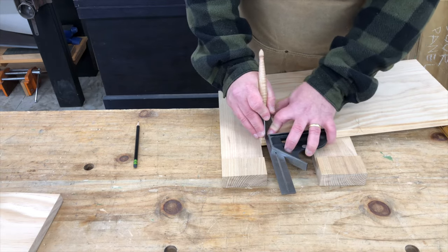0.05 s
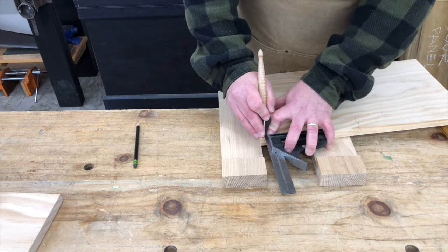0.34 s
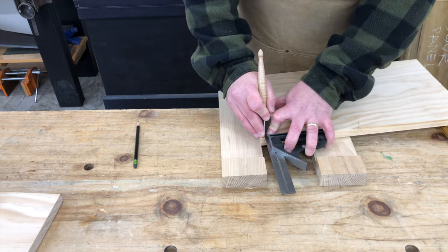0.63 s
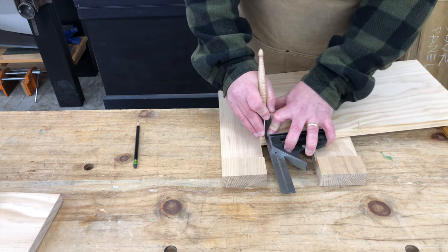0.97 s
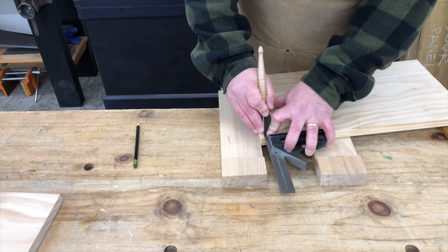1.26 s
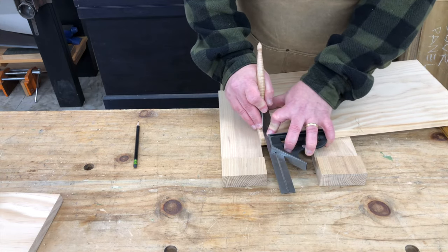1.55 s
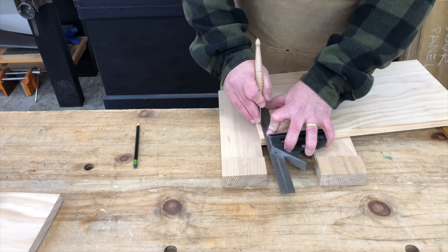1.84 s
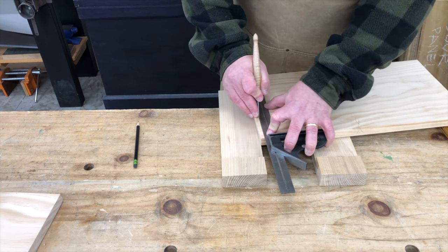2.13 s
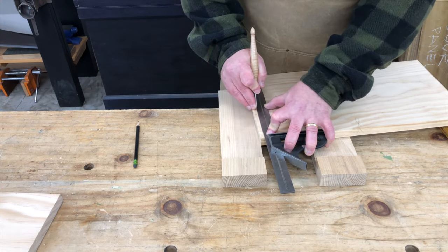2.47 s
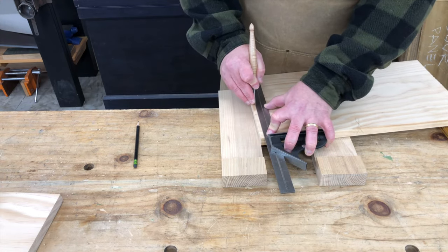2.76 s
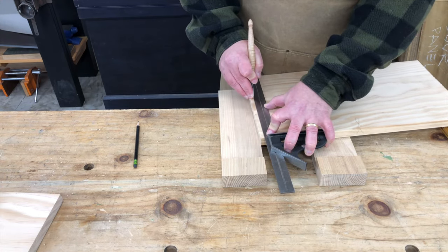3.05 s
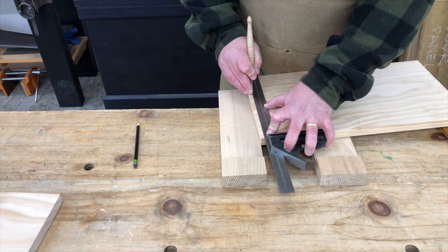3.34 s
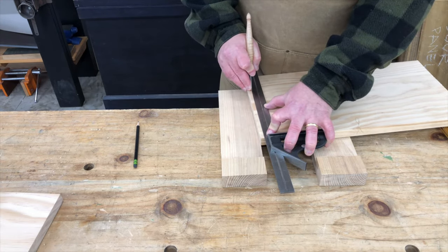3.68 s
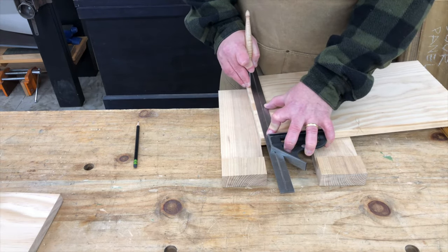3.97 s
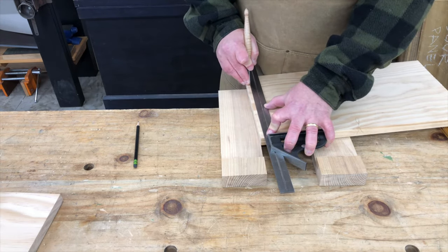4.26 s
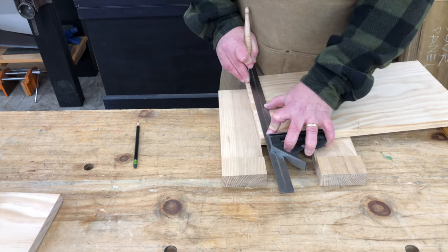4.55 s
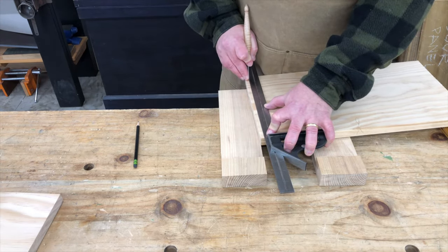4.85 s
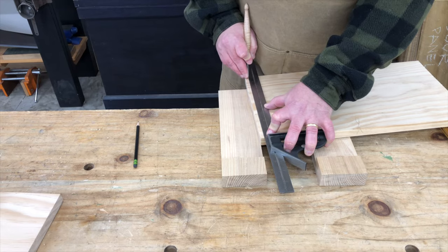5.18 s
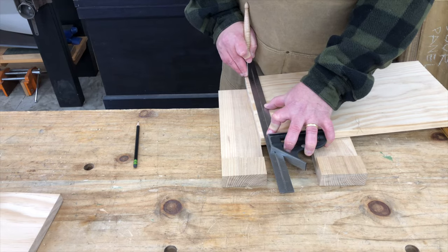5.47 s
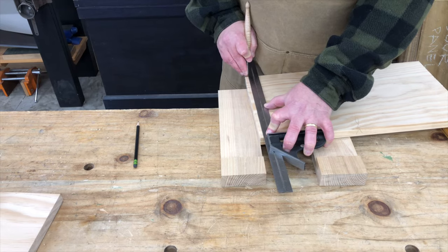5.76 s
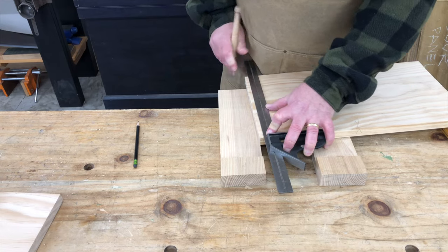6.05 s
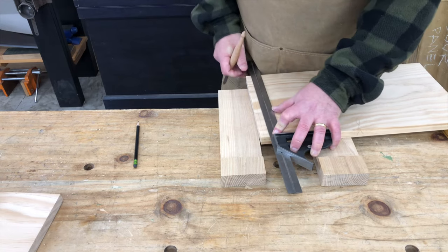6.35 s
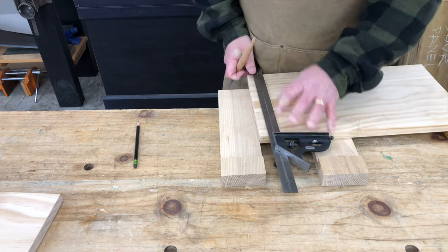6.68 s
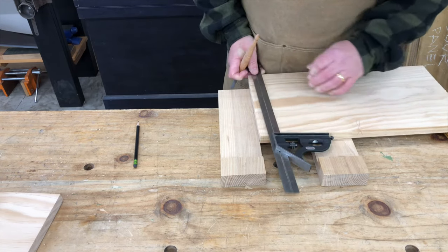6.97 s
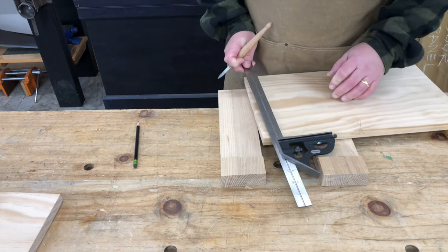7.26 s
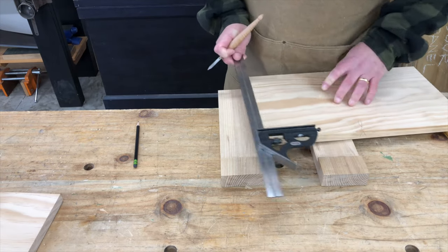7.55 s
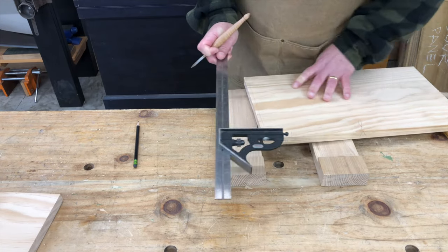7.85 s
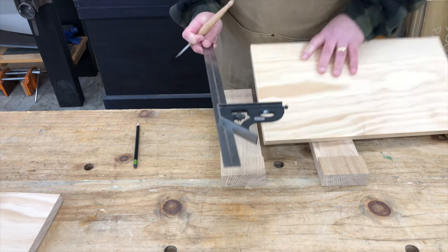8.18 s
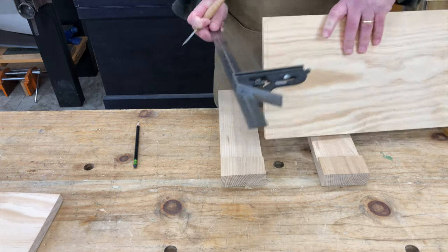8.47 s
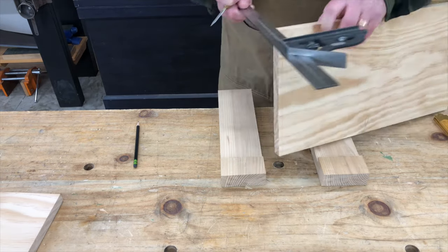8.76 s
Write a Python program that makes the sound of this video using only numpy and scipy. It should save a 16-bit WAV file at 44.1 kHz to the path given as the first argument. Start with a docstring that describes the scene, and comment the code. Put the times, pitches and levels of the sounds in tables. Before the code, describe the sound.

A knife scrapes across a wooden board in dry, crackling strokes, then the board knocks and a steel square rattles.

```python
"""Marking a pine board with a knife

A knife is drawn along a steel square: one long dry stroke, then short ones that snap through the grain.
Stick-slip friction makes the wood rasp and the blade hiss. The board rocks on its blocks and knocks in
its damped modes, hands rub over it, and the square rattles as both are lifted off the bench.
The bench rumbles under the work, and a quiet workshop reverberates around it."""
import sys
import numpy as np
from scipy import signal
from scipy.fft import rfft, irfft
from scipy.io import wavfile

SR = 44100
rng = np.random.default_rng(int(sys.argv[2]) if len(sys.argv) > 2 else 0)


def waveform_to_disk(signal):
    """Save audio, clipped to [-1, 1], as 16-bit WAV at the path in sys.argv[1]."""
    frames = np.transpose(np.atleast_2d(signal))
    scaled = np.clip(frames, -1, 1) * 32767
    samples = np.round(scaled).astype(np.int16)
    wavfile.write(sys.argv[1], SR, samples)


N = 397765
TIME = np.arange(N) / SR

# The long cut, as the hand bears down and eases. Each row: time in seconds, rasp level in dB.
LONG_CUT = [(1.27, -64.5), (1.43, -57), (1.54, -45), (1.78, -50), (2.3, -46.5), (2.44, -53), (2.78, -49.5),
            (2.86, -44.5), (2.98, -49.5), (3.4, -46.5), (3.55, -58.5)]
# Short strokes before and after it. Each row: start in seconds, length in seconds, rasp level in dB,
# hiss level in dB, swell from start to end in dB, bench rumble in dB.
SHORT_STROKES = [(1.044, 0.14, -46.5, -52.5, -1, -55), (3.542, 0.14, -42, -57, 18, -66),
                 (3.707, 0.23, -47.5, -64.5, 4, -70), (4.122, 0.37, -47, -62, -9, -69),
                 (4.519, 0.17, -46.5, -55.5, 5.5, -62), (4.839, 0.076, -43, -51, 8, -58),
                 (5.092, 0.17, -53, -60.5, 19.5, -78), (5.683, 0.043, -40.5, -48.5, 6.5, -51)]
# The blade's place on the board. Each row: time in seconds, rasp resonance in Hz, its relative level
# in dB, echo delay along the rule in seconds.
BLADE_PLACE = [(1.05, 2060, -4, 0.00085), (1.35, 1900, -0.5, 0.00088), (1.6, 1810, 5.5, 0.00088),
               (1.95, 1660, 3, 0.00091), (2.3, 1150, -2.5, 0.0009), (2.9, 1050, -1.5, 0.00081),
               (3.5, 1010, 0, .0008), (4.6, 1450, 1, 0.00087), (5.3, 1630, -1, 0.00086),
               (5.9, 1110, -20, 0.0008)]
# Spectra of the wood's rasp and the edge's hiss. Each row: frequency in Hz, relative density in dB.
RASP_SPECTRUM = [(40, -15), (80, -5), (130, 10), (230, -13), (400, 3), (560, -6.5), (800, 1.5), (1100, -6),
                 (1600, -2), (2100, -6.5), (2800, -5.5), (3150, -13), (5000, -37.5)]
HISS_SPECTRUM = [(1800, -22), (2700, 2), (3150, -1), (3700, 2), (4600, -5.5), (5200, -9.5), (5700, -2.5),
                 (6200, -21), (6700, -6), (8400, -14.5), (9500, -21.5), (12400, -19), (13500, -24),
                 (15500, -34)]
# Modes of the thin blade, the board on the bench and the hand-damped steel square.
# Each row: frequency in Hz, relative level in dB, T60 (time to decay by 60 dB) in seconds.
BLADE_MODES = [(2380, -5.5, 0.2), (2970, -37, 0.031), (3700, -7, 0.046), (3910, 8.5, 0.032),
               (4570, 6.5, 0.024), (5190, 8, 0.032), (6200, 7, 0.021), (6450, 5, 0.014), (7140, 1, 0.021),
               (7320, -23, 0.0067), (8100, 3, 0.022), (11500, -25, 0.0027), (12500, 0, .004)]
BOARD_MODES = [(130.9, -5, 0.19), (148.6, -12.5, 0.39), (199.3, -21, 0.45), (244, -12, 0.1),
               (313.7, -11, 0.19), (390.2, -3.5, 0.068), (432, -10.5, 0.21), (468, -8.5, 0.33),
               (494.7, 2.5, 0.096), (590.5, -15, 0.14), (631.7, -15.5, 0.18), (732, -10.5, 0.04),
               (735, -13, 0.037), (794.5, -14, 0.13), (903, -13, 0.091), (1008, -13.5, 0.035),
               (1043, -7.5, 0.097), (1075, -1.5, 0.019), (1210, -13, 0.21), (1338, -4, 0.019),
               (1380, -26, 0.24), (1442, -5.5, 0.051), (1760, -8, 0.059), (1850, -9, 0.067),
               (2146, -13, 0.063), (2294, -11.5, 0.064), (2480, -18, 0.1)]
SQUARE_MODES = [(1835, 1, 0.024), (2110, -1, 0.062), (2160, 1, 0.015), (2440, -2.5, 0.035),
                (2920, -5, 0.018), (3202, -2, 0.046), (3880, -20, 0.021), (4070, -6, 0.051),
                (4900, -3, 0.019), (6000, -13, .04), (6600, -11, 0.025), (7740, -12.5, 0.023),
                (9000, -25, .025)]
# The blade breaks hard grain lines. Each row: start in seconds, wood level in dB, treble level in dB,
# nominal length in seconds.
SNAPS = [(2.844, -44, -49, 0.0084), (3.326, -38, -57, 0.0042), (3.347, -40, -50, .003),
         (3.397, -39.5, -46.5, 0.0067), (3.571, -42.5, -47, 0.0054), (3.63, -33, -30, 0.0089),
         (3.6476, -27, -32, .0028), (3.658, -25.5, -37, 0.0062), (3.664, -31, -32.5, .005),
         (3.685, -42, -36, 0.0044), (3.713, -32, -38, 0.004), (3.7232, -30, -34.5, 0.0039),
         (3.7498, -34, -31.5, 0.0036), (3.7707, -34, -38, .0025), (3.8138, -33, -36.5, 0.0031),
         (3.833, -41, -39, 0.0031), (3.838, -31, -37, 0.0023), (3.8745, -25, -41, 0.0017),
         (4.1206, -26, -26, 0.0045), (4.149, -39, -43, 0.0064), (4.176, -50, -40.5, 0.0047),
         (4.203, -33.5, -42, 0.0057), (4.2213, -27.5, -39, 0.0036), (4.302, -50, -41, 0.0082),
         (4.344, -45, -43, 0.0057), (4.382, -37, -43, 0.0061), (4.425, -35, -41, 0.0048),
         (4.597, -43, -42, 0.0021), (4.6355, -36, -33, 0.0072), (4.6642, -25, -28, 0.0035),
         (4.851, -35, -34.5, 0.0042), (4.895, -37, -49, 0.0033), (5.2645, -32, -40.5, 0.0031),
         (5.643, -44.5, -60, 0.0069), (5.658, -39, -53, 0.0047), (5.6919, -21, -34, 0.0037)]
# The spectrum of a snap. Each row: frequency in Hz, relative density in dB.
SNAP_SPECTRUM = [(100, -27), (400, 4.5), (560, -8), (800, 0), (1300, 3.5), (1650, 2), (1950, -6.5),
                 (2400, -2.5), (3050, -18.5), (4600, -10.5), (6500, -19), (8400, -27.5), (9800, -31),
                 (15000, -34.5)]
# The board strikes its blocks. Each row: start in seconds, blow level in dB, contact hardness as a
# cutoff in Hz, tick level in dB.
KNOCKS = [(4.125, -24, 870, -39), (4.307, -29.5, 580, -70), (4.641, -28, 665, -72), (4.664, -28, 643, -61),
          (5.694, -21, 1130, -43), (5.701, -19.5, 203, -74), (6.412, -52, 706, -76),
          (6.5592, -8, 1306, -40.5), (6.5673, -32, 650, -65), (6.77, -36.5, 1100, -59),
          (6.853, -41.5, 900, -75), (7.058, -30, 148, -76), (7.11, -44, 800, -75),
          (7.2386, -28.5, 4500, -34.5), (7.247, -22, 1210, -54), (7.258, -17, 780, -41.5),
          (7.265, -14, 228, -67), (7.2775, -24, 760, -46.5), (7.294, -26, 180, -78),
          (7.503, -22.5, 100, -65), (7.588, -42.5, 590, -76), (7.748, -42.5, 404, -76),
          (7.867, -31.5, 1380, -59), (7.883, -27.5, 298, -52.5), (7.913, -25.5, 130, -56),
          (8.023, -40, 1030, -75), (8.097, -47, 2230, -74), (8.283, -31, 354, -72), (8.304, -25, 200, -72),
          (8.627, -30.5, 1030, -51), (8.646, -22, 870, -43), (8.659, -31.5, 804, -56),
          (8.683, -19.5, 660, -43), (8.71, -32, 440, -54), (8.873, -29, 670, -39), (8.926, -25, 330, -48),
          (8.975, -39, 500, -49), (9.004, -11.5, 860, -30.5)]
# The board's modes shift as it is pressed, left free and lifted. Each row: time in seconds, pitch ratio.
SUPPORT_PITCH = [(4.7, .87), (5.7, .92), (6.0, 1), (8.4, 1), (8.6, .915)]
# Spectra of a blow's tick and of the bench top's many close, damped modes.
# Each row: frequency in Hz, relative density in dB.
TICK_SPECTRUM = [(400, -32), (1500, 2), (2600, -2), (3100, -4), (4200, -4.5), (6000, -8.5), (9000, -18),
                 (15000, -29)]
BENCH_SPECTRUM = [(60, -11.5), (150, -1.5), (300, 0), (520, -1), (800, -2.5), (1300, -5), (1900, -16.5),
                  (3000, -44), (6000, -62)]
# The square hits the board. Each row: start in seconds, level in dB, frequency in Hz favoured by the
# place of contact.
RATTLES = [(8.517, -51, 4020), (8.625, -36, 3060), (8.643, -37, 3100), (8.66, -32, 2130),
           (8.684, -35.5, 4000), (8.721, -36.5, 5000), (8.751, -42.5, 4000), (8.828, -47, 4000),
           (8.871, -43, 3000), (8.927, -52, 4000), (8.97, -44.5, 3080), (8.979, -46.5, 3080),
           (9.005, -24, 1830)]
# Steel touches the wood lightly. Each row: start in seconds, level in dB.
TAPS = [(5.9995, -30), (6.015, -47), (7.559, -40)]
# Hands, sleeves and board slide. Each row: start in seconds, length in seconds, scuff level in dB,
# swish level in dB, swell from start to end in dB, scrape pitch in Hz.
SLIDES = [(5.87, 0.15, -57, -71, 9, 3020), (6.0, 0.098, -53.5, -63.5, -2, 2300),
          (6.12, 0.37, -66, -74.5, -11.5, 2000), (6.464, 0.13, -58, -64, 18, 5600),
          (6.607, 0.33, -54, -68, -4, 5600), (6.896, 0.074, -58.5, -62.5, 10, 4170),
          (7.02, 0.3, -64, -74, -16, 2000), (7.462, 0.29, -56.5, -58.5, 1, 5200),
          (7.924, 0.22, -62.5, -56.5, 7, 5800), (8.196, 0.082, -52.5, -48, 1, 4400),
          (8.27, 0.047, -43, -46, -4.5, 2970), (8.36, 0.05, -54.5, -78, -4, 3000),
          (8.475, 0.16, -67, -56, -6, 3800), (8.614, 0.058, -44.5, -49, 1.5, 7000),
          (8.798, 0.22, -56, -76, -4, 4000)]
# Spectra of the low scuff, the high swish and the room's air.
# Each row: frequency in Hz, relative density in dB.
SCUFF_SPECTRUM = [(40, -12), (130, 8.5), (220, 0), (470, 0), (700, -3), (1300, -5.5), (2100, -12),
                  (3000, -24), (5000, -36)]
SWISH_SPECTRUM = [(1200, -5.5), (2300, -1.5), (3000, -7), (4000, -5), (5500, -11.5), (7000, -15.5),
                  (9000, -22.5), (12000, -27.5), (15500, -37.5)]
AIR_SPECTRUM = [(25, -13.5), (60, 0.5), (130, -9), (250, -8), (480, -3.5), (800, -11), (1250, -10.5),
                (2000, -17.5), (3000, -24.5), (5000, -29), (9000, -32.5), (15000, -33)]
# The workshop's echo. Each row: frequency in Hz, level against the direct sound in dB, T60 in seconds.
REVERB_BANDS = [(99, -15.5, 0.47), (397, -8, 0.47), (910, -5.5, 0.54), (1830, -11.5, 0.53),
                (4700, -15.5, 0.98), (13200, -11.5, 0.33)]


def scoring(rasp_gain, hiss_gain, grain_hz=70, max_catch_db=1.5):
    """Stick-slip excitation: as fibres part, the wood rasps and hums and the edge hisses and sings."""
    times, *columns = np.transpose(BLADE_PLACE)
    place_hz, place_db, echo_s = (np.interp(TIME, times, c) for c in columns)
    fibres = friction(per_s=8200, uneven_db=2.0, catch_hz=129)
    tip = friction(per_s=6000, uneven_db=1.5, catch_hz=120)
    near_blade = cut(moving_resonance(tip, place_hz, width_hz=360), 2320, order=4)
    share = from_db(place_db)
    hum = from_db(-6) * rms_one(ring(cut(fibres, 205), BOARD_MODES))
    rasp = (colour(fibres, RASP_SPECTRUM) + share * near_blade) / np.sqrt(1 + share ** 2) + hum
    against_rule = friction(per_s=8000, uneven_db=2.5, catch_hz=100)
    singing = rms_one(cut(ring(against_rule, BLADE_MODES), 1900, "high"))
    hiss = from_db(-2.5) * colour(fibres, HISS_SPECTRUM) + from_db(-6) * singing
    # A short echo along the rule forms a comb filter that slides with the blade.
    hiss = hiss + .35 * np.interp(TIME - echo_s, TIME, hiss)
    # The deeper the score, the more the blade catches and runs on hard and soft grain.
    catch_db = np.clip(1 + 0.5 * (TIME - times[0]), 0, max_catch_db)
    catching = flutter(catch_db, grain_hz) + fibre_breaks() * catch_db / max_catch_db
    return catching * (from_db(-1.55) * rasp_gain * rasp + from_db(-0.73) * hiss_gain * hiss)


def knife_effort(hiss_offset_db=-8.5, dulling_db_per_s=1):
    """Amplitude follows force: the hand's push sets the gains of rasp, hiss and bench rumble."""
    times, cut_db = np.transpose(LONG_CUT)
    rasp = from_db(np.interp(TIME, times, cut_db)) * (TIME >= times[0]) * (TIME < times[-1])
    hiss = rasp * from_db(hiss_offset_db - dulling_db_per_s * (TIME - times[0]))   # the blade sinks in
    rumble = np.zeros(N)
    for start, length, rasp_db, hiss_db, swell_db, rumble_db in SHORT_STROKES:
        push = gesture(start, length, swell_db, attack_s=0.025, release_db_per_s=243)
        rasp += from_db(rasp_db) * push
        hiss += from_db(hiss_db) * push
        rumble += from_db(rumble_db) * push
    return rasp, hiss, rumble


def fibre_breaks(per_s=24, decay_s=0.0031):
    """A Poisson process: small fibres give way at random, each briefly raising the gain of the cut."""
    breaks = (rng.random(N) < per_s / SR) * rng.uniform(0.37, 1.97, N)
    return from_db(-0.5) * signal.lfilter([1], [1, -np.exp(-1 / (decay_s * SR))], breaks + 1e-18)


def snapping(size=2048):
    """Brittle fracture: a hard grain line fails in a burst of milliseconds that jolts the blade."""
    dull, bright = np.zeros(N), np.zeros(N)
    for start, wood_db, treble_db, length in SNAPS:
        age = 2 * TIME[:size] / length
        burst = rng.standard_normal(size) * (age * np.exp(1 - age)) ** 2
        add(dull, start, burst * from_db(wood_db))
        add(bright, start, burst * from_db(treble_db))
    crack = from_db(8.5) * cut(colour(bright, SNAP_SPECTRUM), 2500, "high", order=3)
    body = from_db(0.5) * cut(colour(dull, SNAP_SPECTRUM), 2200, order=3)
    return body + crack + from_db(-44) * ring(bright, BLADE_MODES)


def knocking(pitch_scatter=0.0059, vary_db=1.5, held_until_s=6.6, size=16384):
    """Impact excitation: each blow ticks, sets the board's modes ringing and thuds in the bench top."""
    wood, ticks, thuds = np.zeros(N), np.zeros(N), np.zeros(N)
    mode_hz, mode_db, mode_t60 = np.transpose(BOARD_MODES)
    heaviest_db = max(row[1] for row in KNOCKS)
    for start, db, hardness_hz, tick_db in KNOCKS:
        # The board rests a little differently at every blow.
        scatter = 1 + pitch_scatter * rng.standard_normal(len(mode_hz))
        pitch = np.interp(start, *np.transpose(SUPPORT_PITCH)) * scatter
        strengths = db + mode_db + vary_db * rng.standard_normal(len(mode_hz))
        t60 = mode_t60 * (0.68 if start < held_until_s else 1)   # the pressing hand adds damping
        # A hard contact is a small one and hardly moves the lowest modes.
        force = cut(contact(hardness_hz, size), 0.1 * hardness_hz, "high", order=1)
        add(wood, start, ring(force, zip(pitch * mode_hz, strengths, t60)))
        add(ticks, start, noise_burst(tick_db, size, t60=0.065))
        bench_db = db - 7 + 0.17 * (db - heaviest_db)   # light blows hardly reach the bench
        add(thuds, start, cut(noise_burst(bench_db, size, t60=0.19), hardness_hz))
    return from_db(-1.5) * wood + colour(ticks, TICK_SPECTRUM) + colour(thuds, BENCH_SPECTRUM)


def rattling(hardness_hz=5500, favour_db=8, favour_octaves=0.18, vary_db=2.5, size=8192):
    """Modal selection: the loose square hits and chatters, and the place of contact weights its modes."""
    out = np.zeros(N)
    mode_hz, mode_db, mode_t60 = np.transpose(SQUARE_MODES)
    for start, db, favoured_hz in RATTLES:
        chatter = cut(noise_burst(-21, size, t60=0.023), hardness_hz)
        favour = favour_db * np.exp(-(np.log2(mode_hz / favoured_hz) / favour_octaves) ** 2)
        strengths = db + mode_db + favour + vary_db * rng.standard_normal(len(mode_hz))
        force = contact(hardness_hz, size) + chatter
        add(out, start, ring(force, zip(mode_hz, strengths, mode_t60)))
    return from_db(-5) * out


def tapping(cutoff_hz=3200, size=2048):
    """Contact transients: steel ticks on the wood too lightly to ring the board."""
    out = np.zeros(N)
    for start, db in TAPS:
        add(out, start, noise_burst(db, size, t60=0.016))
    return cut(out, cutoff_hz)


def sliding(dragged_from_s=7.4):
    """Sliding friction: skin, cloth and wood rub in fine slips that also ring the square and board."""
    low_gain, high_gain = np.zeros(N), np.zeros(N)
    scrape_hz = np.full(N, float(SLIDES[0][-1]))
    for start, length, scuff_db, swish_db, swell_db, hz in SLIDES:
        push = gesture(start, length, swell_db, attack_s=0.033, release_db_per_s=181)
        low_gain = np.hypot(low_gain, from_db(scuff_db) * push)   # incoherent sounds add in power
        high_gain = np.hypot(high_gain, from_db(swish_db) * push)
        scrape_hz[TIME >= start] = hz
    rub = friction(per_s=16000, uneven_db=1.5, catch_hz=67.6)
    scuff = from_db(1) * colour(rub, SCUFF_SPECTRUM)
    swish = from_db(-2.5) * colour(rub, SWISH_SPECTRUM)
    steel = from_db(-16.5) * rms_one(ring(np.gradient(rub), SQUARE_MODES))
    scrape = from_db(-7) * cut(moving_resonance(rng.standard_normal(N), scrape_hz, width_hz=1900), 9900)
    drag = cut(cut(rub, 1400), 170, "high")   # rings the board once the board itself slides
    board = from_db(-1) * (TIME > dragged_from_s) * rms_one(ring(drag, BOARD_MODES))
    return low_gain * (scuff + board) + high_gain * (swish + scrape + steel)


def bench_rumble(push_gain, blow_offset_db=-31, t60=0.27):
    """Forced vibration: the heavy bench stirs under the short strokes and after every blow."""
    blows = np.zeros(N)
    for start, db, *_ in KNOCKS:
        add(blows, start, from_db(db + blow_offset_db - 60 * TIME[:SR] / t60))
    deep_noise = rms_one(cut(cut(rng.standard_normal(N), 65), 32, "high"))
    return (push_gain + blows) * deep_noise


def reverberation(x, first_echo_s=.007, bands=9):
    """A diffuse field: the workshop's echoes decay exponentially, each band at its own rate."""
    t, response = TIME[:SR], np.zeros(SR)
    edges = np.geomspace(45, 17000, bands + 1)
    for low, high in zip(edges, edges[1:]):
        db, t60 = at_hz(REVERB_BANDS, np.sqrt(low * high))
        decay = from_db(-60 * t / t60) * (t > first_echo_s)
        bandpass = signal.butter(2, [low, high], "band", fs=SR, output="sos")
        band = signal.sosfilt(bandpass, rng.standard_normal(SR))
        response += from_db(db) * band * decay / np.linalg.norm(decay)
    return signal.oaconvolve(x, response)[:N]


def room_air(level_db=-67.5):
    """Stationary noise: the quiet room's air, strongest in the bass."""
    return from_db(level_db) * colour(rng.standard_normal(N), AIR_SPECTRUM)


def friction(per_s, uneven_db, catch_hz):
    """Stick-slip force: tiny slips at random, stronger where the surface catches; rms 1."""
    catching = flutter(uneven_db, catch_hz)
    slips = (rng.random(N) < per_s / SR) * rng.standard_normal(N)
    return rms_one(slips * catching)


def flutter(depth_db, cutoff_hz):
    """Random amplitude modulation: a gain that wanders by depth_db rms."""
    return from_db(depth_db * rms_one(cut(rng.standard_normal(N), cutoff_hz)))


def gesture(start, length, swell_db, attack_s, release_db_per_s):
    """The envelope of one push: the hand takes hold, swells or eases evenly, and lets go."""
    age = TIME - start
    progress = np.clip(age / length, 0, 1)
    release_db = release_db_per_s * np.maximum(age - length, 0)
    return np.clip(age / attack_s, 0, 1) * from_db(swell_db * (progress - .5) - release_db)


def contact(hardness_hz, size):
    """The force pulse of one touch: a softer contact lasts longer."""
    return cut(signal.unit_impulse(size), hardness_hz)


def noise_burst(db, size, t60):
    """White noise in exponential decay."""
    return rng.standard_normal(size) * from_db(db - 60 * TIME[:size] / t60)


def ring(force, modes):
    """Modal superposition: a force excites damped sines, neighbours swinging in opposite senses."""
    out = np.zeros(len(force))
    for k, (hz, db, t60) in enumerate(modes):
        radius, angle = np.exp(-np.log(1000) / (t60 * SR)), 2 * np.pi * hz / SR
        poles = [1, -2 * radius * np.cos(angle), radius ** 2]
        out += (-1) ** k * from_db(db) * signal.lfilter([0, np.sin(angle)], poles, force + 1e-18)
    return out


def moving_resonance(x, hz, width_hz, block=256):
    """A two-pole resonator whose centre follows the curve hz; rms 1."""
    radius = np.exp(-np.pi * width_hz / SR)
    out, state = np.zeros(N), np.zeros(2)
    for i in range(0, N, block):
        poles = [1, -2 * radius * np.cos(2 * np.pi * hz[i] / SR), radius ** 2]
        out[i:i + block], state = signal.lfilter([1, 0, -1], poles, x[i:i + block], zi=state)
    return rms_one(out)


def colour(x, spectrum, size=4096):
    """Minimum-phase filtering to the given spectrum; white noise keeps its level."""
    db, = at_hz(spectrum, np.maximum(np.fft.rfftfreq(size, 1 / SR), 1))
    cepstrum = irfft(np.log(from_db(db)))
    cepstrum[1:size // 2] *= 2   # folding the cepstrum makes the response causal
    cepstrum[size // 2 + 1:] = 0
    response = irfft(np.exp(rfft(cepstrum)))
    return signal.oaconvolve(x, response / np.linalg.norm(response))[:N]


def cut(x, hz, kind="low", order=2):
    """Butterworth low- or high-pass filtering."""
    return signal.sosfilt(signal.butter(order, hz, kind, fs=SR, output="sos"), x + 1e-18)


def at_hz(points, hz):
    """Interpolation of a table's columns on a log-frequency axis."""
    known_hz, *columns = np.transpose(points)
    return [np.interp(np.log(hz), np.log(known_hz), c) for c in columns]


def add(track, start, sound):
    """Superposition of a short sound on a track, start in seconds."""
    i = round(start * SR)
    track[i:i + len(sound)] += sound[:N - i]


def from_db(db):
    """Decibels to amplitude ratio."""
    return 10 ** (np.asarray(db) / 20)


def rms_one(x):
    """Normalisation to an rms of 1."""
    return x / np.sqrt(np.mean(x ** 2) + 1e-20)


def scene():
    """Linear superposition of the direct sound, its reverberation, the bench's rumble and the air."""
    rasp_gain, hiss_gain, rumble_gain = knife_effort()
    direct = scoring(rasp_gain, hiss_gain) + snapping() + tapping() + knocking() + rattling() + sliding()
    return (direct + reverberation(direct) + bench_rumble(rumble_gain) + room_air())[None]


def record(dry):
    """Band limiting: a steep elliptic low-pass removes the highest treble."""
    cutoff_hz = 15900
    return signal.sosfilt(signal.ellip(10, .1, 80, cutoff_hz, fs=SR, output="sos"), dry)


dry = scene()
out = record(dry)
waveform_to_disk(out)
```